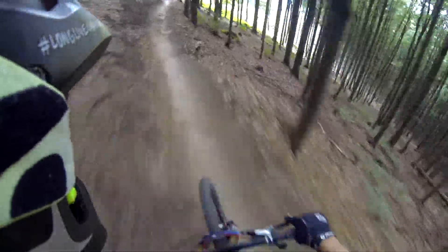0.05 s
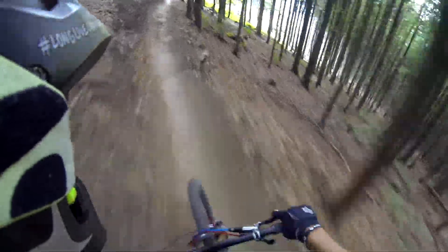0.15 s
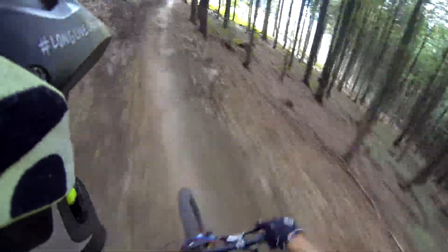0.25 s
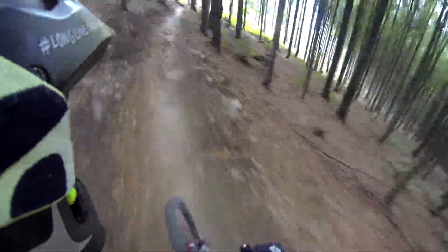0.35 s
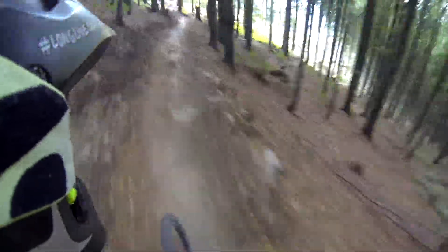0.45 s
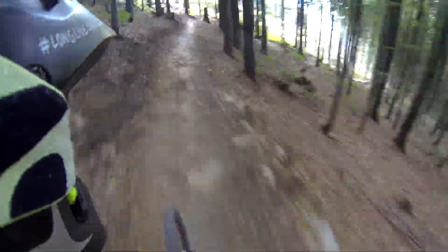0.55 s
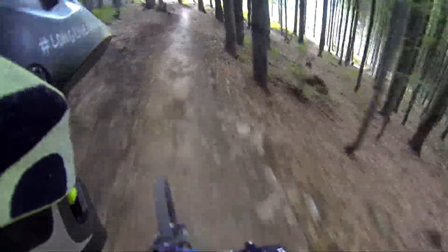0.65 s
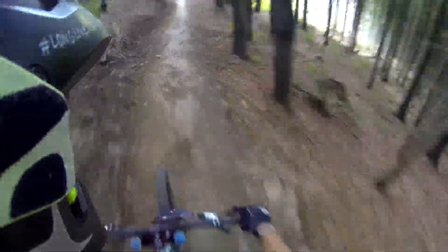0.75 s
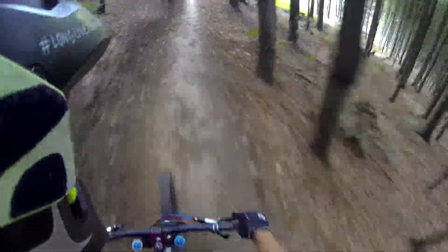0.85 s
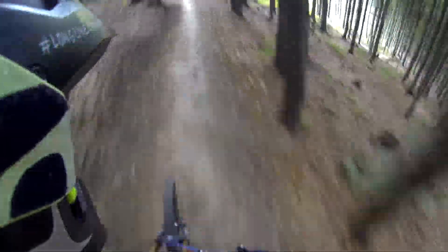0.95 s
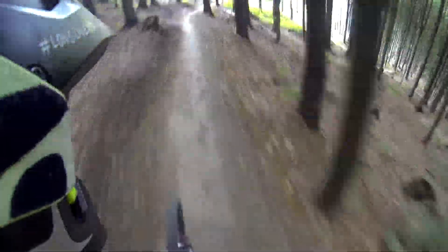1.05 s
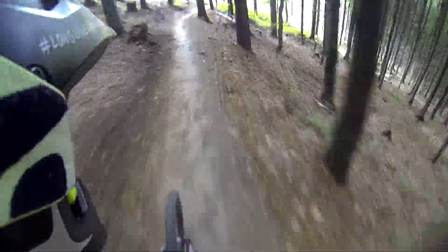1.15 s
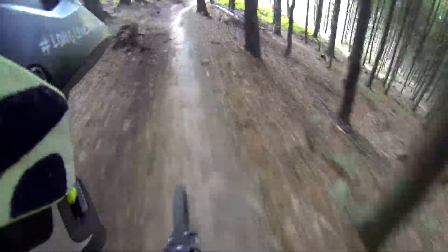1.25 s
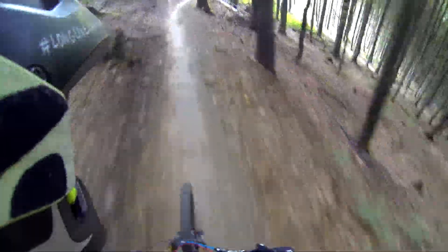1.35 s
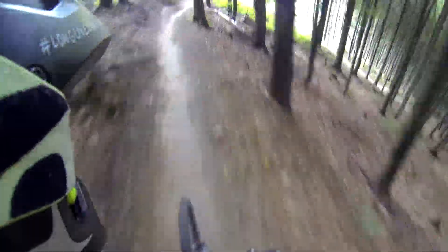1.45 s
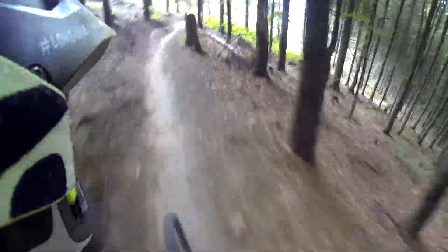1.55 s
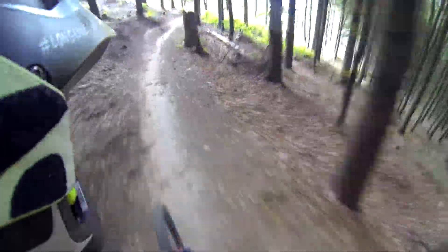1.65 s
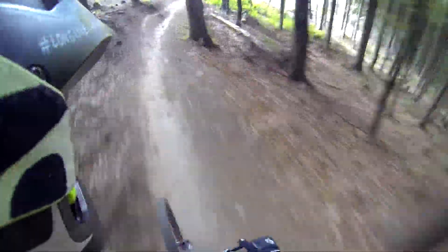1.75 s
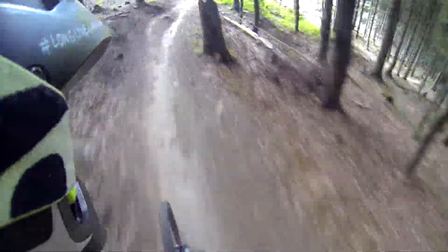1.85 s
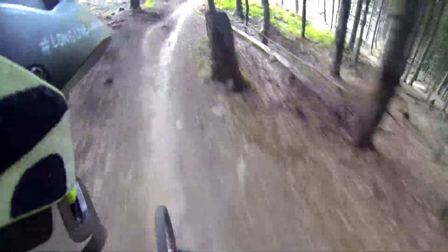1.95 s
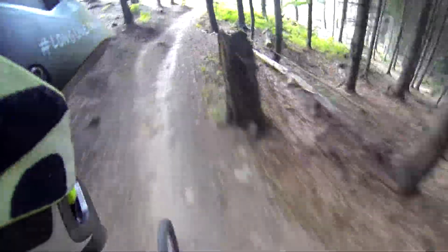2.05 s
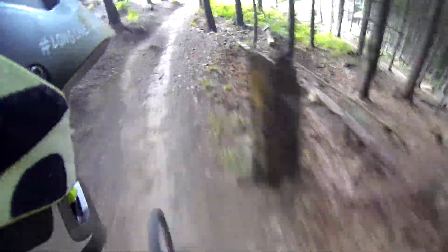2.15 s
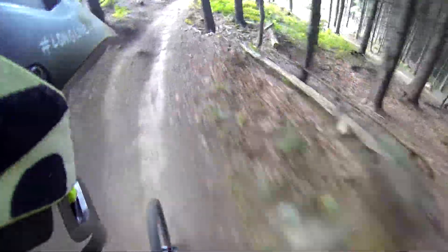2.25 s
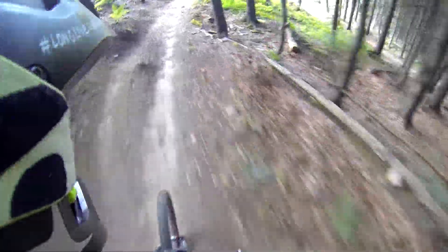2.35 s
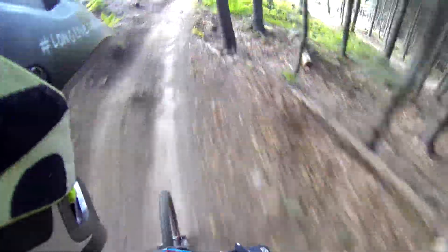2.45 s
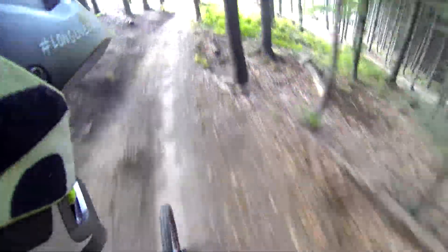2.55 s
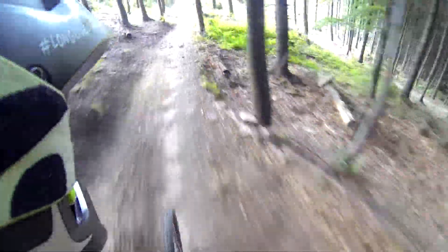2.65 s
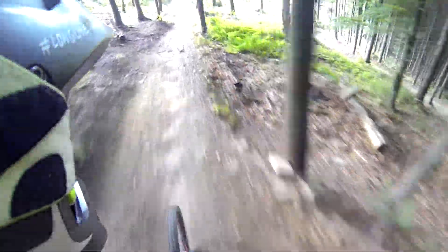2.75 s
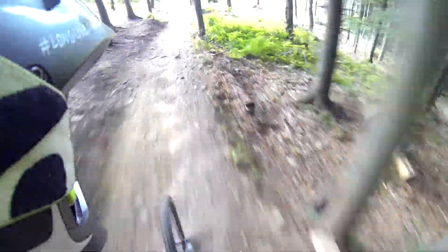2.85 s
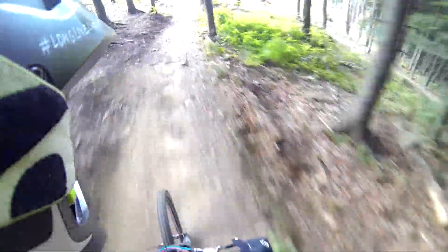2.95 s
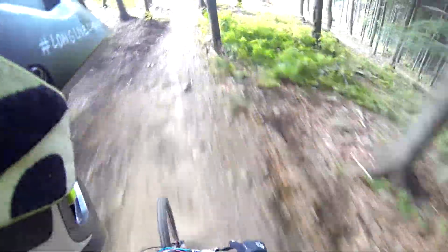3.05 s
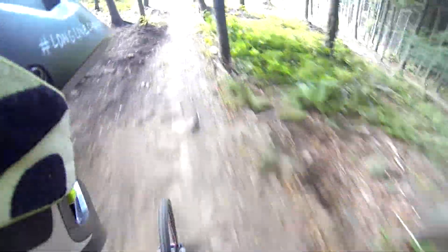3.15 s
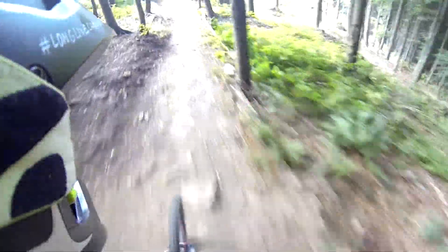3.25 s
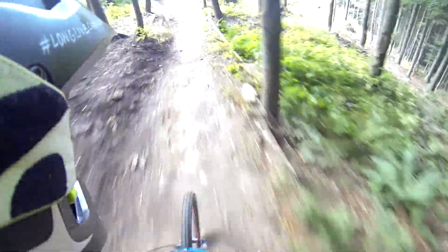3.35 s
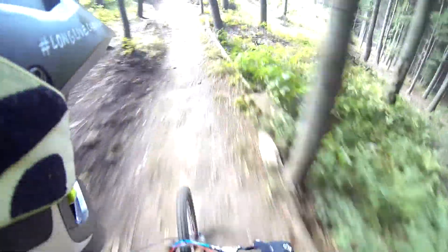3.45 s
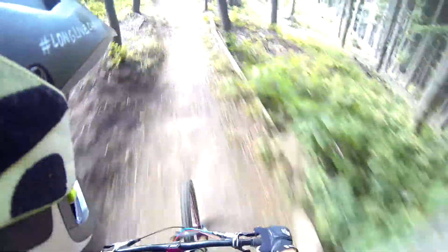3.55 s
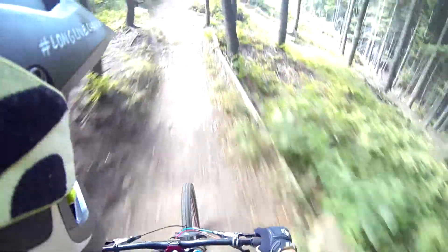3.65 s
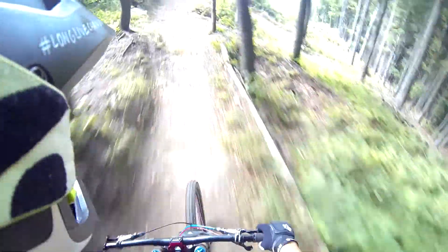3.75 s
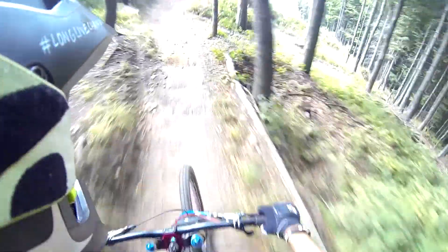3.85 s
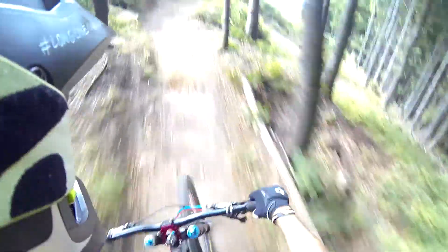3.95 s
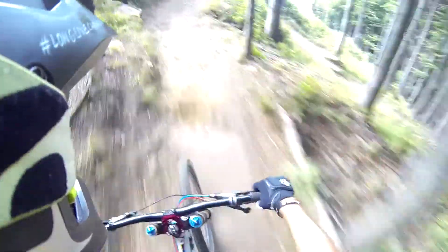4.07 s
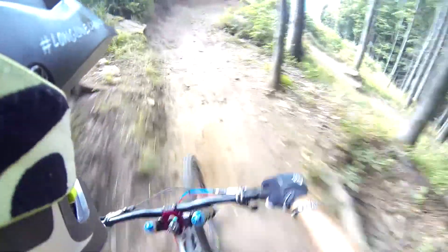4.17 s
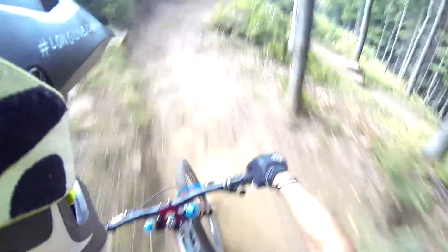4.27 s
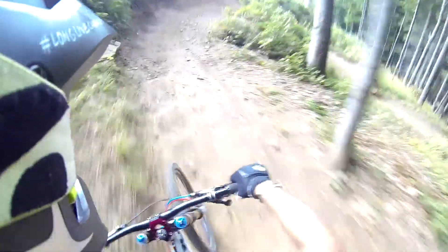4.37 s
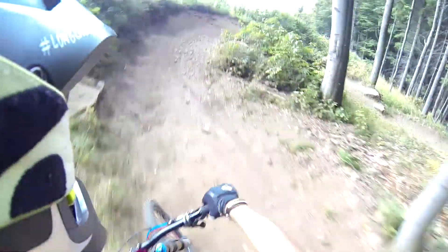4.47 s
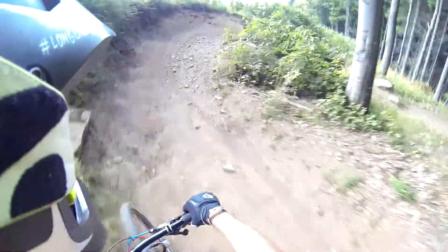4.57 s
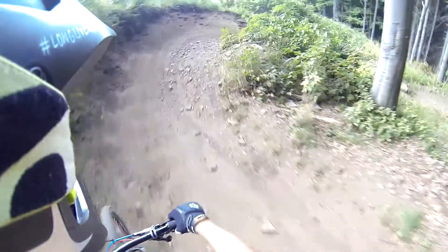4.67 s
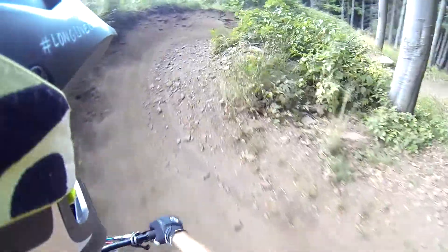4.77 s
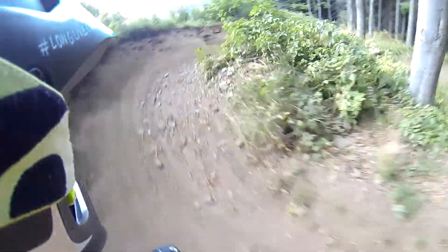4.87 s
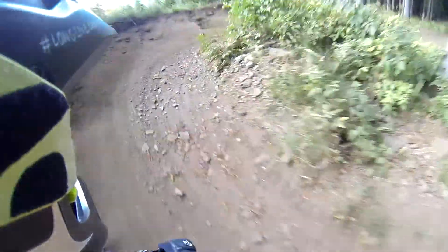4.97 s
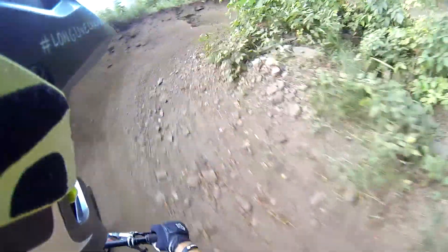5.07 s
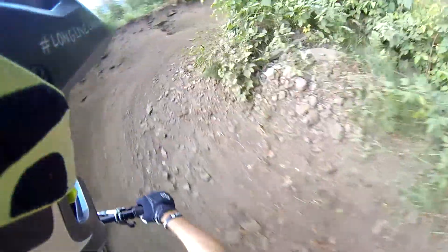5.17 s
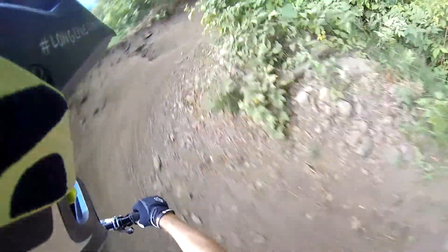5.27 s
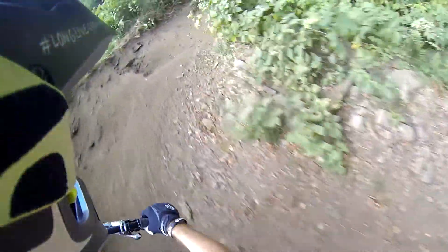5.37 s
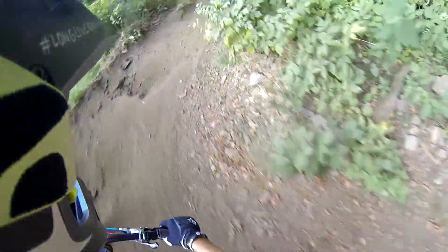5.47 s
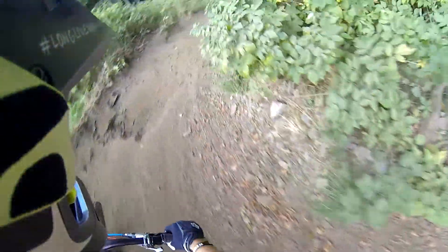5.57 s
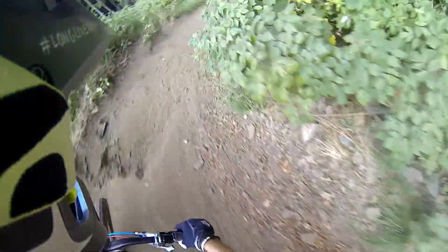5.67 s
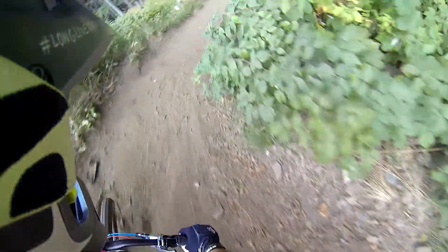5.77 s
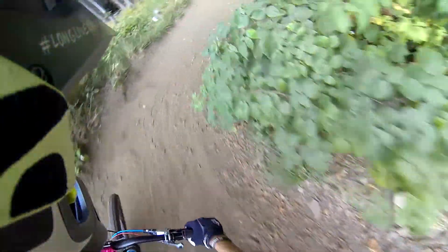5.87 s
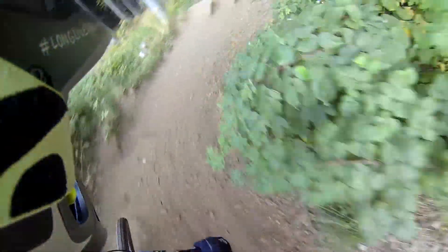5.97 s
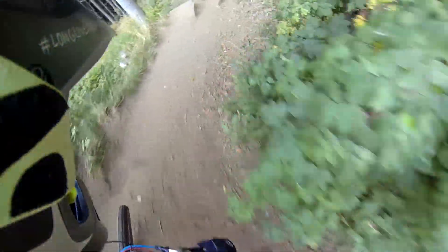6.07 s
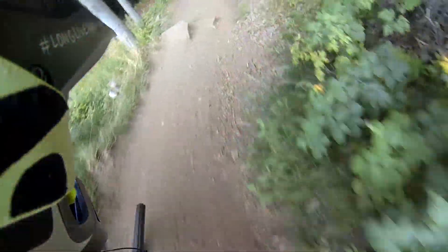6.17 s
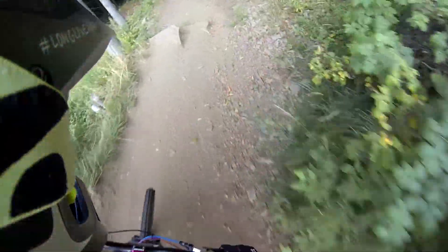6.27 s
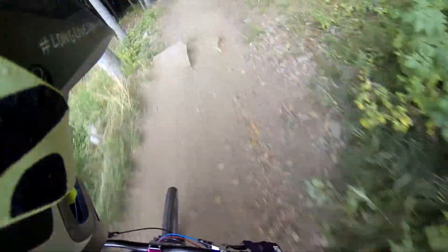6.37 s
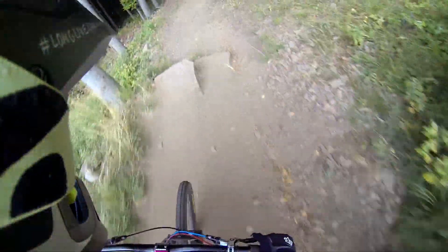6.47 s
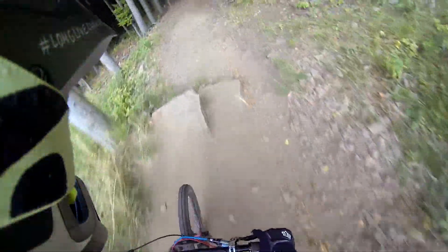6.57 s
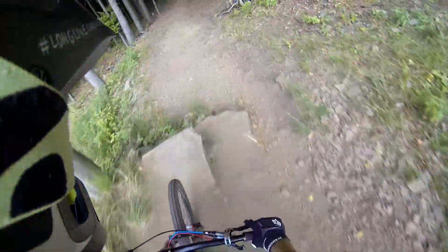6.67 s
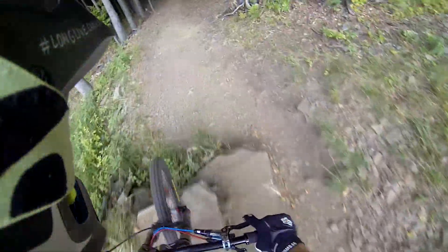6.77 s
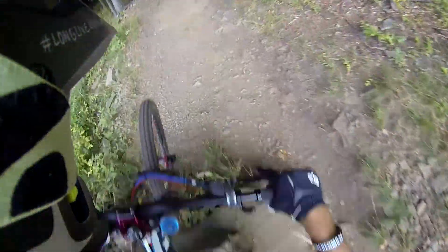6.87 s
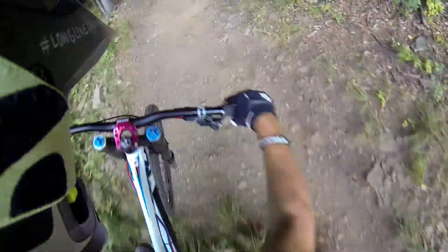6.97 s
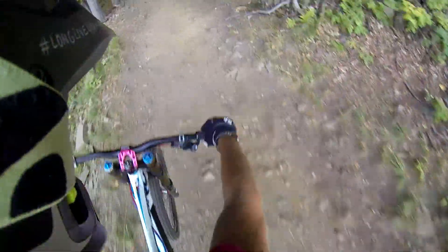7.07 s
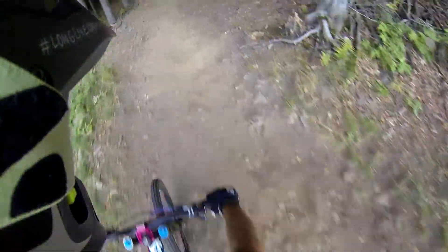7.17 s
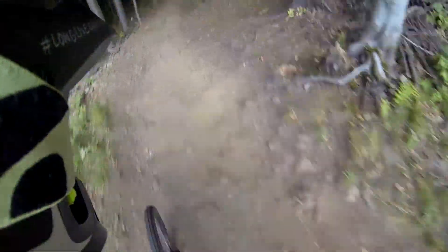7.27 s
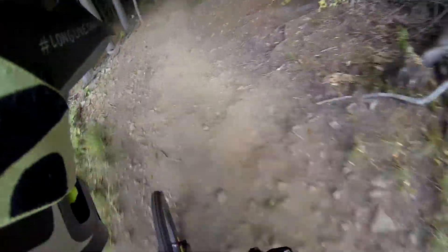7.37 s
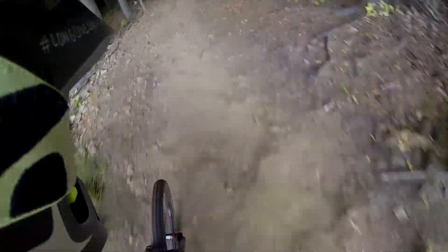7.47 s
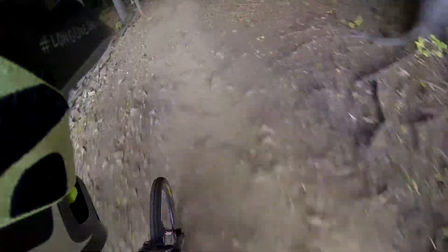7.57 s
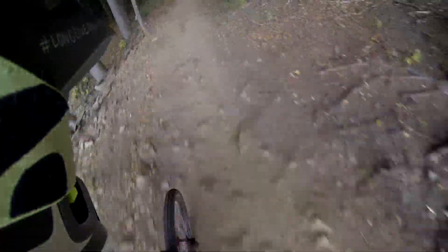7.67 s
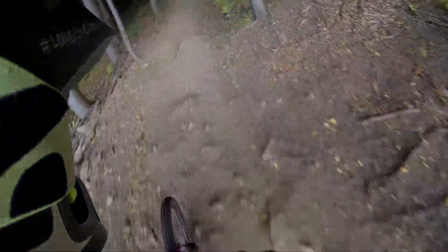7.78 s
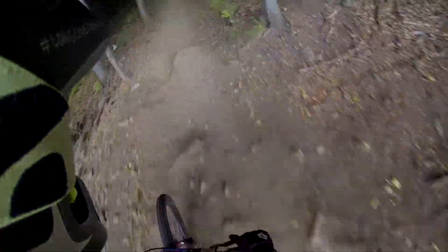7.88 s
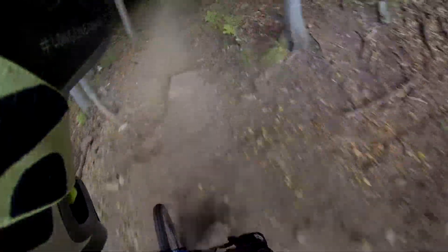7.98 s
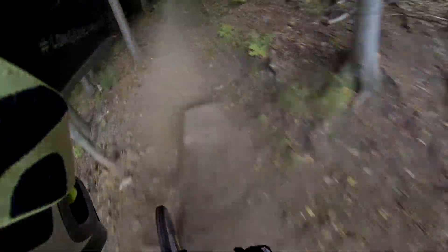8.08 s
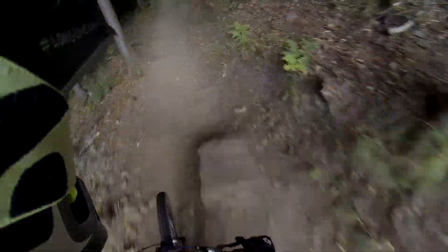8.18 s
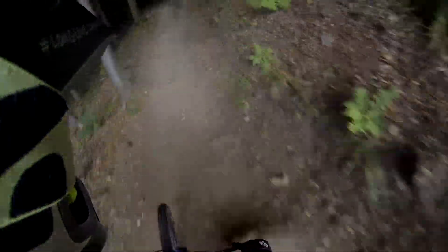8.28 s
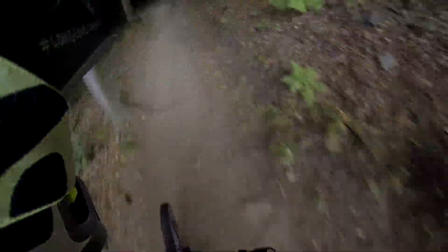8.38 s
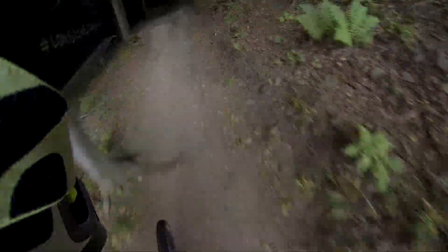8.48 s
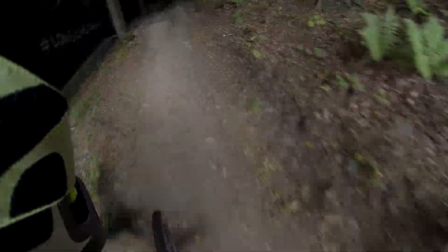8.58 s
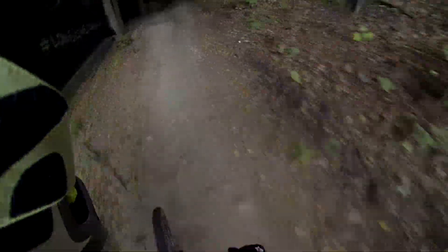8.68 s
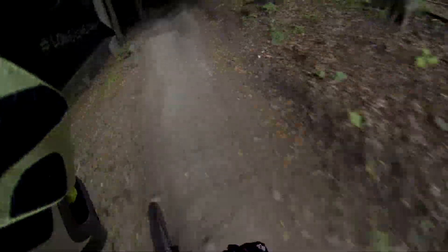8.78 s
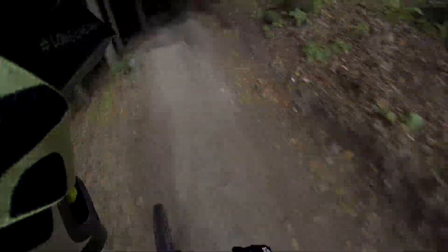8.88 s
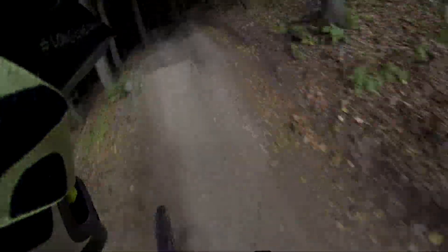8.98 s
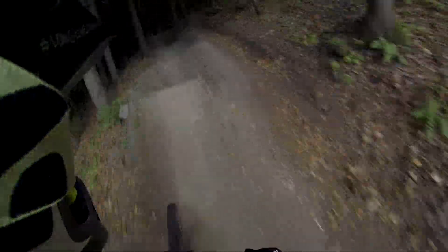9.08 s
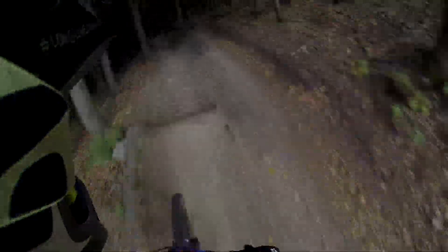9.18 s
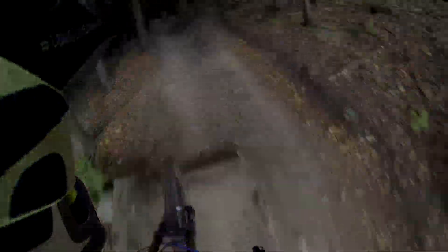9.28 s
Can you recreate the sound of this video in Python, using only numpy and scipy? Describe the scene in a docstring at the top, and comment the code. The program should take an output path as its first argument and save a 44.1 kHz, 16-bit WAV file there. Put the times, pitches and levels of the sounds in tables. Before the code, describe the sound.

A mountain bike descends a dirt forest trail, heard from a helmet camera microphone. From 0 to 4.5 seconds, deep wind buffeting and a fluttering rush surge in gusts, over quieter tyre crunch, jingling chain, clinks, snapping stones and dull frame knocks. Sharper knocks stand out near 2.2, 3.9 and 4.2 seconds, with a stone ping around 3.1. At 4.9 a hard rap hits the camera housing, and the wind drops through a slow bend, leaving faint scuffs near 5.3. A wheel slams with a ringing clack and rattle at 6.1. Faint brake squeaks chirp between 5.8 and 7.5. A low double tyre thud with clatter lands at 7.2 to 7.3. From 7.7 the wind and rolling strengthen again, with bright clinks and knocks around 8.0 to 8.6, and a short hollow rumble at 9.2. A thin, high hiss stays faint behind.

```python
"""A mountain bike runs down a dirt trail, heard from a microphone in a camera on the rider's helmet.
Its knobby tyres crunch over grit (coloured impacts and noise) and at the end roll onto something hollow.
Chain and cables clink, the frame knocks, stones snap and ping, wheels clack or thud: shaped noise and ringing modes.
Close by, wind buffets the microphone and eases in a slow bend: coloured noise in eddies, gusts and lulls.
The camera housing takes a few raps, a brake squeaks faintly, and a thin hiss lies high up behind it all."""
import sys
import numpy as np
from scipy import signal
from scipy.fft import rfft, irfft
from scipy.io import wavfile
from scipy.ndimage import uniform_filter1d

SR = 44100
rng = np.random.default_rng(int(sys.argv[2]) if len(sys.argv) > 2 else 0)


def dump(signal):
    """Clip the signal to [-1, 1] and save it as 16-bit WAV at the path in sys.argv[1]."""
    limited = np.clip(np.atleast_2d(signal).T, -1, 1)
    pcm = np.round(limited * 32767).astype(np.int16)
    wavfile.write(sys.argv[1], SR, pcm)


N = 411438
TIME = np.arange(N) / SR


def amp(db):
    """Decibels to gain."""
    return 10 ** (np.asarray(db) / 20)


def evened(x):
    """Scales to rms 1."""
    return x / np.sqrt(np.mean(x ** 2) + 1e-20)


def curve(rows):
    """A level in dB, joined by straight lines in time."""
    return np.interp(TIME, *np.transpose(rows))


def lift(s, half_s, db):
    """Rounded changes of level, in dB, that come and go."""
    return sum(top * np.exp(-((TIME - at) / half) ** 2) for at, half, top in zip(s, half_s, db))


def add(mix, s, sound):
    """Mixes a sound in at time s."""
    part = mix[max(round(s * SR), 0):][:len(sound)]
    part += sound[:len(part)]


def band(x, edges):
    """The part of a sound between two frequencies."""
    return signal.sosfilt(signal.butter(3, edges, "band", fs=SR, output="sos"), x)


def response(points, size=4096):
    """The causal impulse response of a colour, falling away beyond its last point."""
    hz, db = np.transpose(points)
    f = abs(np.fft.fftfreq(size, 1 / SR))
    gain = amp(np.interp(np.log(f + 1), np.log(hz), db))
    gain = gain / np.maximum(f / hz[-1], 1) ** 2
    # minimum phase: the phase follows from the log gain
    spectrum = np.exp(np.conj(signal.hilbert(np.log(gain))))
    return np.fft.ifft(spectrum).real[:size // 2]


def coloured(x, points, edges, size=4096):
    """Colours a sound and brings its main band to rms 1."""
    y = signal.oaconvolve(x, response(points, size))[:N]
    return y / np.std(band(y, edges))


def wander(hz):
    """Slow chance of rms 1, fading out above a rate."""
    f = np.fft.rfftfreq(N, 1 / SR)
    return evened(irfft(rfft(rng.standard_normal(N)) / (1 + (f / hz) ** 4), N))


def steadied(x, span_s):
    """Holds the slow level of a noise even, leaving its fast churning."""
    window = signal.windows.hann(int(span_s * SR))
    weight = signal.oaconvolve(np.ones(N), window, "same")
    power = signal.oaconvolve(x ** 2, window, "same") / weight
    return np.std(x) * evened(x / np.sqrt(np.maximum(power, 1e-12)))


def grains(per_s, spread_db):
    """Random tiny impacts, a few much larger than the rest."""
    size = amp(spread_db * np.minimum(rng.exponential(1, N), 4))
    sign = rng.choice([-1., 1.], N)
    return evened(size * sign * (rng.random(N) < per_s / SR))


def ticks(per_s, spread_db, low_hz, high_hz, decay_s, count=24):
    """Many small things struck at random, each ringing briefly at its own pitch."""
    t = np.arange(SR // 25) / SR
    out = np.zeros(N)
    for hz in np.geomspace(low_hz, high_hz, count):
        tone = np.exp(-t / decay_s) * np.sin(2 * np.pi * hz * t)
        out += signal.oaconvolve(grains(per_s / count, spread_db), tone)[:N]
    return evened(out)


def swells(rows, colour):
    """Brief rounded bursts of coloured noise."""
    swell = sum(amp(db) * np.exp(-((TIME - s) / half) ** 2) for s, db, half in rows)
    return swell * coloured(rng.standard_normal(N), colour, (200, 3000))


def clatter(rows, colour, edges, strike, rise_s, decay_s, tail_db, tail_s, part_db=8, part_q=1.8):
    """Each blow is a strike, a scatter of contacts and a faint after-rattle; a pitched part rings broadly."""
    out, t, body = np.zeros(N), np.arange(SR // 8) / SR, response(colour)
    scatter = np.exp(-t / decay_s) + amp(tail_db) * np.exp(-t / tail_s)
    shape = (1 - np.exp(-t / rise_s)) * scatter
    for s, db, *pitch in rows:
        contacts = shape * rng.standard_normal(len(t))
        contacts[0] = strike * np.linalg.norm(contacts)
        blow = signal.fftconvolve(contacts, body)
        if pitch:
            part = signal.lfilter(*signal.iirpeak(pitch[0], part_q, fs=SR), blow)
            blow = blow + amp(part_db) * part
        # crest: twice the strongest short-time rms in the main band
        crest = 2 * np.sqrt(uniform_filter1d(band(blow, edges) ** 2, size=128).max())
        add(out, s, amp(db) * blow / crest)
    return out


def ring(rows, modes, detune, contact_hz):
    """Single blows on a set of modes, a little different each time; a softer contact is duller."""
    out, t = np.zeros(N), np.arange(SR // 12) / SR
    contact = signal.butter(3, min(contact_hz, .45 * SR), fs=SR)
    for s, peak_db in rows:
        spot = 1 + detune * rng.standard_normal(len(modes))
        swings = [amp(db - 60 * t / t60) * np.sin(2 * np.pi * hz * k * t)
                  for (hz, db, t60), k in zip(modes, spot)]
        # neighbouring modes swing in opposite senses, so the ring takes a moment to build
        blow = signal.lfilter(*contact, sum(swings[::2]) - sum(swings[1::2]))
        add(out, s, amp(peak_db) * blow / abs(blow).max())
    return out


# Level of the thin hiss. Each row: time in seconds, level in dB.
HISS_LEVEL = [(.7, -80), (1.1, -73.5), (9.33, -73)]
# Colour of the hiss. Each row: frequency in Hz, relative density in dB per Hz.
HISS_COLOUR = [(5000, -12), (7200, -6.5), (8500, 5.5), (9500, -3), (11900, -4.5), (13300, 4.5),
               (15000, -20)]


def hiss():
    """Faint thin noise high up, behind everything."""
    return amp(curve(HISS_LEVEL)) * coloured(rng.standard_normal(N), HISS_COLOUR, (11500, 15500))


# Force of the headwind, easing through the slow bend. Each row: time in seconds, level in dB.
HEADWIND = [(-0.0, -12), (0.29, -14), (0.76, -17), (2.45, -18.5), (2.5, -15), (3.0, -14), (4.13, -14.5),
            (4.92, -19.5), (5.09, -24.5), (5.44, -22.5), (5.79, -30.5), (6.29, -28), (6.8, -21),
            (7.05, -26.5), (7.65, -20.5), (7.76, -16.5), (8.47, -14.5), (9.33, -14.5)]
# Gusts and lulls on the headwind. Each row: centre in seconds, half length in seconds,
# lift of the buffeting in dB, lift of the rush in dB.
GUSTS = [(0.207, 0.02, -9, -1.5), (0.296, 0.03, 5, 4), (0.653, 0.13, 2, 7), (0.753, .025, -6, -3),
         (0.84, .04, -1.5, 7), (0.917, 0.012, -6, -1), (1.115, 0.098, 4.5, 8.5), (1.287, 0.011, 7.5, 4),
         (1.36, 0.02, -4, -3.5), (1.52, 0.19, 3.5, 6.5), (1.85, 0.02, -5, -5), (1.918, 0.021, 9.5, 8),
         (2.17, 0.23, 4.5, 5), (2.405, 0.042, -3, 0), (2.554, 0.06, 5, 0), (3.012, 0.13, 3.5, 3.5),
         (3.586, 0.019, 2.5, 0), (3.678, 0.014, -17, 5), (4.08, 0.049, 5, 1), (4.23, .025, -6, -2),
         (4.303, 0.012, 5, 1), (5.43, 0.053, 6.5, 2), (6.126, 0.064, 4, 11), (6.306, 0.12, -1.5, 3.5),
         (6.85, 0.078, 1.5, -0.5), (7.32, 0.16, 8, 9), (7.86, 0.25, 0, 1), (8.143, 0.047, -6, 0.5),
         (8.312, 0.057, 5.5, 3), (9.203, 0.026, -1, 6.5)]
# Colours of the buffeting and of the finer rush. Each row: frequency in Hz, relative density in dB per Hz.
BUFFET_COLOUR = [(8, -7), (20, -10), (32, 1.5), (65, -2), (110, -5.5), (170, -11.5), (260, -21), (500, -48),
                 (1200, -86)]
RUSH_COLOUR = [(70, -21), (160, -2), (270, -2), (400, -6.5), (600, -12.5), (850, -18), (1200, -24.5),
               (2000, -30), (4000, -53.5), (9000, -89.5)]
# the rush at a brisk headwind, and the dB it gains for each dB of headwind
BRISK_DB, RUSH_DB, RUSH_GROWTH = -15, -27, 1.48


def wind(eddy_db=1.5, buffet_db=0.09, coupling=0.15, darkening=0.43, deep_hz=85, surge_db=1.2, surge_hz=7):
    """Large eddies thump the microphone port; a finer rush flutters with them and grows faster with headwind."""
    s, half_s, thump_lift, rush_lift = np.transpose(GUSTS)
    force = curve(HEADWIND) - BRISK_DB
    eddies = amp(eddy_db * wander(30))
    thump = coloured(rng.standard_normal(N) * eddies, BUFFET_COLOUR, (20, 200), size=16384)
    thump = steadied(thump, .3)
    churn = rng.standard_normal(N) * eddies * np.exp(coupling * thump)
    rush = steadied(coloured(churn, RUSH_COLOUR, (250, 700)), .15)
    # slower air sheds fewer small eddies, so the buffeting deepens
    deep = signal.sosfiltfilt(signal.butter(2, deep_hz, fs=SR, output="sos"), thump)
    thump = deep + (thump - deep) * amp(darkening * np.minimum(force, 0))
    thump = thump * amp(curve(HEADWIND) + buffet_db + lift(s, half_s, thump_lift))
    rush = rush * amp(RUSH_DB + RUSH_GROWTH * force + lift(s, half_s, rush_lift))
    # both surge and ebb together
    surges = evened(steadied(amp(surge_db * wander(surge_hz)), .6))
    return surges * (thump + rush)


def overload(x, ceiling=0.92):
    """The strongest swings flatten softly at the diaphragm's limit."""
    return x / (1 + (x / ceiling) ** 4) ** (1 / 4)


# Raps on the camera housing, at the microphone itself. Each row: start in seconds, peak in dB.
RAPS = [(4.883, -11), (4.8973, -2), (4.9003, -15), (4.9065, -16), (4.912, -18)]
# Ringing of the housing. Each row: frequency in Hz, relative level in dB, time to fall 60 dB in seconds.
HOUSING_MODES = [(450, -2, .012), (720, -6, .03), (855, 1, .03), (980, 2, .02), (1180, 13, .008),
                 (1590, 2, .017), (2080, -3, .02), (2500, -8, .013), (3000, -8, .007), (3500, -14, .008),
                 (5150, -30, .04)]


def raps():
    """Blows on the camera housing excite its short-lived modes."""
    return ring(RAPS, HOUSING_MODES, detune=0.025, contact_hz=4800)


# Faint squeaks of a brushing brake. Each row: start in seconds, length in seconds,
# start pitch in Hz, end pitch in Hz, level in dB.
SQUEAKS = [(5.834, 0.035, 2100, 2230, -48), (6.254, 0.038, 2120, 2000, -42),
           (6.817, 0.073, 1700, 2340, -42.5), (6.953, .06, 1900, 2900, -43), (7.42, 0.053, 2360, 2000, -37)]


def squeaks(waver=0.089):
    """Stick and slip of the brake: a short, unsteady tone that glides."""
    out = np.zeros(N)
    for s, length_s, start_hz, end_hz, db in SQUEAKS:
        size = int(length_s * SR)
        hz = np.linspace(start_hz, end_hz, size) * (1 + waver * wander(400)[:size])
        tone = np.sin(2 * np.pi * np.cumsum(hz) / SR)
        add(out, s, amp(db) * evened(np.hanning(size) * tone))
    return out


# Colour of chain and cables. Each row: frequency in Hz, relative density in dB per Hz.
CHAIN_COLOUR = [(900, -9.5), (2080, 11.5), (2700, -7), (3080, 3.5), (3900, -1), (4450, -8.5), (5000, 0),
                (5300, 2), (6200, -9), (6850, -8.5), (7600, -14), (8500, -11.5), (11800, -25), (15000, -29)]
# the jingle at a fast roll, and the dB it gains for each dB of rolling
FAST_ROLL_DB, JINGLE_DB, JINGLE_GROWTH = -37, -60.5, 0.87


def jingle(clump_db=3.5, ringing=0.75, shaking=1.0):
    """Chain links chatter in clumps, more at speed and on rough ground, some ringing briefly."""
    s, half_s, _, chain_lift = np.transpose(ROUGH_GROUND)
    links = coloured(grains(per_s=2500, spread_db=3), CHAIN_COLOUR, (5000, 11000))
    tinkle = ticks(per_s=1600, spread_db=7.5, low_hz=2930, high_hz=12460, decay_s=0.0039, count=32)
    tinkle = coloured(tinkle, CHAIN_COLOUR, (5000, 11000))
    chatter = (links + ringing * tinkle) / np.hypot(1, ringing)
    clumps = evened(steadied(amp(clump_db * wander(40)), 0.3))
    level = JINGLE_DB + JINGLE_GROWTH * (curve(ROLLING) - FAST_ROLL_DB)
    level = level + shaking * lift(s, half_s, chain_lift)
    return amp(level) * chatter * clumps


# Chain and cables strike the frame hard. Each row: start in seconds, level in dB before the mix trim.
CLINKS = [(0.2548, -37), (0.4095, -36.5), (0.8131, -37), (0.9991, -33), (1.1424, -33.5), (1.5573, -33.5),
          (1.7933, -36), (1.8437, -38), (2.257, -28.5), (2.8335, -34), (3.1602, -34), (3.271, -29.5),
          (3.3797, -32), (3.6721, -38.5), (3.927, -33.5), (4.1949, -36.5), (4.4782, -32), (4.5351, -32.5),
          (4.6563, -32.5), (4.819, -31), (4.8705, -31.5), (5.0609, -34), (5.0968, -40), (5.1724, -34.5),
          (5.5453, -35), (5.8856, -33.5), (5.912, -48), (5.93, -34), (6.1594, -28), (6.2406, -32),
          (6.3639, -34.5), (6.8007, -36), (7.2664, -31), (7.2958, -28.5), (7.9506, -32.5), (8.0304, -26),
          (8.1793, -33), (8.3814, -26), (8.8568, -36), (8.988, -30)]


def clinks():
    """Chain and cables hit the frame in a bright scatter of contacts."""
    return clatter(CLINKS, CHAIN_COLOUR, (4500, 15000), strike=0.5, rise_s=0.0017, decay_s=0.0037,
                   tail_db=-20.0, tail_s=0.045)


# Flung stones on metal. Each row: start in seconds, peak in dB before the mix trim.
PINGS = [(2.6332, -30), (3.0775, -22), (4.0435, -36), (4.163, -36), (7.7542, -28.5), (8.3424, -31)]
# Ringing of struck metal. Each row: frequency in Hz, relative level in dB, time to fall 60 dB in seconds.
METAL_MODES = [(2930, 0, .016), (3990, -6.5, 0.041), (5000, -1, 0.0079), (5680, -3.5, 0.022),
               (6800, -6.5, 0.01), (8500, -10.5, 0.013), (10700, -10, 0.01), (12900, -10, 0.014)]


def flung_grit(below_roll_db=-4, spread_db=4, count=36):
    """Small stones tick against the bike at random, following the rolling level: rows as in PINGS."""
    when, size = rng.random((count, 2)).T
    s = (np.arange(count) + when) / count * N / SR
    roll_db = np.interp(s, *np.transpose(ROLLING))
    return list(zip(s, roll_db + below_roll_db + spread_db * (2 * size - 1)))


def pings():
    """Stones, large and small, set the metal's high modes ringing."""
    return ring(list(PINGS) + flung_grit(), METAL_MODES, detune=0.042, contact_hz=14500)


# Hard jolts that shake the whole bike. Each row: start in seconds, level in dB, decay constant in seconds.
JOLTS = [(6.126, -22, 0.03), (7.235, -24.5, 0.019), (7.261, -34, 0.045), (8.344, -32, 0.031)]
# Colour of the shaken bike. Each row: frequency in Hz, relative density in dB per Hz.
SHAKE_COLOUR = [(250, -48), (550, 4), (850, 1), (1300, -2), (2100, -4.5), (2750, -8), (3100, -9),
                (4200, -19), (5400, -16), (6200, -28), (14000, -41)]


def jolts():
    """A hard landing sets every loose part rattling at once."""
    shake = sum(amp(db) * (TIME >= s) * np.exp(-abs(TIME - s) / decay) for s, db, decay in JOLTS)
    return shake * coloured(grains(per_s=1400, spread_db=2.5), SHAKE_COLOUR, (300, 8000))


# Wheels hit roots and rocks and some part of the frame knocks. Each row: start in seconds,
# level in dB before the mix trim, pitch of the part in Hz.
KNOCKS = [(1.27, -19.5, 1150), (1.4386, -18.5, 805), (1.7469, -22, 837), (2.2149, -15, 1860),
          (3.5568, -20, 1890), (3.7499, -21, 2760), (3.8195, -20, 900), (3.9, -14, 1790),
          (4.2358, -12.5, 1730), (4.593, -25.5, 826), (4.9856, -20.5, 1820), (6.1024, -29, 886),
          (6.111, -24, 2000), (6.1255, -20, 2300), (7.205, -24, 1730), (7.233, -23, 802),
          (7.2615, -23, 2000), (7.278, -27, 1700), (7.297, -29, 900), (7.3801, -23.5, 700),
          (7.452, -20, 1030), (7.671, -20, 1540), (8.0346, -19.5, 860), (8.3414, -13.5, 1970),
          (8.381, -21, 1900), (8.5555, -19.5, 810), (8.5949, -15.5, 1820)]
# Colour of the frame. Each row: frequency in Hz, relative density in dB per Hz.
FRAME_COLOUR = [(200, -18), (500, 2), (850, -0.5), (1250, -4.5), (1800, 0.5), (2300, -2.5), (2700, -6),
                (3200, -7), (4400, -26.5), (5200, -18), (6300, -33), (14000, -54)]
FRAME_BAND = (1200, 4000)  # Hz


def knocks():
    """A bump strikes the frame, and one part of it resonates broadly."""
    return clatter(KNOCKS, FRAME_COLOUR, FRAME_BAND, strike=0.59, rise_s=0.00022, decay_s=0.0048,
                   tail_db=-19, tail_s=0.027)


# A wheel slams down, clacks and bounces. Each row: start in seconds, peak in dB.
CLACKS = [(6.1244, -11), (6.1305, -20), (6.141, -24), (6.155, -26)]
# Ringing of the wheel. Each row: frequency in Hz, relative level in dB, time to fall 60 dB in seconds.
WHEEL_MODES = [(540, -11, .06), (790, -1, .06), (965, 2, .05), (1400, -9, .02), (2050, -6, .05),
               (2230, -7, .05), (2470, -4, .035), (3080, -11, .07)]


def clacks():
    """The landing wheel rings in its own modes at each bounce."""
    return ring(CLACKS, WHEEL_MODES, detune=0.012, contact_hz=5000)


# Tyres take the weight after a drop. Each row: start in seconds, peak in dB.
THUDS = [(6.102, -15), (7.2305, -7), (7.288, -11)]
# Booming of a squashed tyre. Each row: frequency in Hz, relative level in dB, time to fall 60 dB in seconds.
CARCASS_MODES = [(68, 4.5, 0.098), (192, -7, 0.042), (340, -4, 0.046)]


def thuds():
    """A squashed tyre booms in a few low modes under a soft contact."""
    return ring(THUDS, CARCASS_MODES, detune=0.091, contact_hz=600)


# The front wheel rolls onto something hollow, perhaps a wooden plank.
# Each row: centre in seconds, level in dB, half length in seconds.
PLANK = [(9.195, -29, 0.034), (9.233, -17.5, 0.0077), (9.25, -23, 0.025)]
# Colour of the hollow rumble. Each row: frequency in Hz, relative density in dB per Hz.
PLANK_COLOUR = [(200, -13), (450, 9), (750, -2), (1250, -6), (2200, -19), (5000, -55)]


def plank():
    """The front wheel on something hollow, perhaps a wooden plank: short low rumbling bursts of noise."""
    return swells(PLANK, PLANK_COLOUR)


# Tyres snap over single stones. Each row: start in seconds,
# level in dB before the mix trim, pitch of the stone in Hz.
STONES = [(0.7964, -21.5, 1880), (0.9588, -22, 1330), (1.7135, -19.5, 1950), (2.051, -21, 1480),
          (2.7358, -21, 1870), (2.95, -21.5, 1310), (3.6686, -23, 2130), (4.066, -18, 1670),
          (4.3675, -20, 1300), (4.4388, -19, 1780), (5.8765, -26, 1670), (6.6395, -28, 1930),
          (7.8014, -20, 1300), (7.9864, -22.5, 2070), (8.8526, -22.5, 1660)]


def snaps():
    """A stone snaps under the tyre: a very short scatter with a resonance at its pitch."""
    return clatter(STONES, FRAME_COLOUR, FRAME_BAND, strike=0.42, rise_s=0.0002, decay_s=0.003,
                   tail_db=-11, tail_s=0.015, part_db=11.5, part_q=6.7)


# Tyres scuff sideways in the bend. Each row: centre in seconds, level in dB, half length in seconds.
SCUFFS = [(5.27, -38, 0.058), (5.425, -35.5, 0.02)]
# Colour of a sliding tyre. Each row: frequency in Hz, relative density in dB per Hz.
SCUFF_COLOUR = [(350, -8), (750, 7), (1020, 6), (1400, -15)]


def scuffs():
    """Short swells of noise as the tyres slide over the dirt."""
    return swells(SCUFFS, SCUFF_COLOUR)


# Tyres rolling on even dirt, below the rider. Each row: time in seconds, level in dB before the tyre trim.
ROLLING = [(0.0, -42), (0.5, -41), (2.5, -40), (2.82, -38), (4.9, -40.5), (5.33, -46), (5.85, -49),
           (6.61, -45), (7.25, -50), (7.78, -38), (8.52, -37), (9.33, -39)]
# Stretches of rough ground. Each row: centre in seconds, half length in seconds,
# lift of the crunch in dB before the bite factor, lift of the chain's jingle in dB.
ROUGH_GROUND = [(0.227, 0.078, 8, 7), (0.832, 0.023, 1, 8.5), (1.11, 0.15, 6, 7), (1.594, 0.12, 8.5, 10),
                (2.242, 0.054, 2.5, 13.5), (3.3, 0.14, 0, 8), (4.265, 0.04, 2.9, 13), (4.412, 0.067, 8, 20),
                (5.912, 0.065, 11, 5), (6.225, 0.084, 5.5, 6), (6.845, 0.02, 6, 13), (6.99, 0.047, 7, 14),
                (7.284, 0.065, 18, 20), (7.424, 0.071, 8.5, 13), (8.054, 0.14, 0.5, 4),
                (8.363, 0.079, 4.5, 13.5), (9.243, 0.039, 5, -1)]
# Colour of the crunch. Each row: frequency in Hz, relative density in dB per Hz.
TYRE_COLOUR = [(250, -11), (600, 1.5), (850, 3), (1250, -4.5), (1700, -1), (2150, -0.5), (2650, -7.5),
               (3050, -6.5), (3800, -14.5), (4400, -23), (5300, -24), (6300, -38), (10000, -38.5),
               (15000, -59)]


def tyres(level_db=-1.34, lumpy_db=2.5, scrub=0.6, stones=0.58, bite=0.9):
    """Knobs crush grit in clumps over a scrub of loose dirt, harder on rough ground; small stones click."""
    s, half_s, crunch_lift, _ = np.transpose(ROUGH_GROUND)
    grit = grains(per_s=1800, spread_db=0.5) + scrub * rng.standard_normal(N)
    grit = coloured(grit * amp(lumpy_db * wander(41)), TYRE_COLOUR, (1400, 3500))
    pebbles = ticks(per_s=260, spread_db=3.5, low_hz=712, high_hz=5720, decay_s=0.0015)
    pebbles = coloured(pebbles, TYRE_COLOUR, (1400, 3500))
    crunch = (grit + stones * pebbles) / np.hypot(1, stones)
    return amp(curve(ROLLING) + level_db + bite * lift(s, half_s, crunch_lift)) * crunch


def scene(clink_db=-3.5, knock_db=-1, ping_db=4.0, stone_db=-2):
    """Wind, rolling and rattling at one helmet microphone."""
    low_sounds = overload(wind() + plank())
    blows = amp(clink_db) * clinks() + amp(knock_db) * knocks()
    blows = blows + amp(ping_db) * pings() + amp(stone_db) * snaps()
    blows = blows + raps() + clacks() + thuds()
    rolling = tyres() + scuffs() + squeaks()
    return (hiss() + low_sounds + rolling + jingle() + jolts() + blows)[None]


def record(dry, edge_hz=15100):
    """The camera's band limit: a steep low-pass."""
    low_pass = signal.firwin(511, edge_hz, window=("kaiser", 9), fs=SR)
    return signal.oaconvolve(dry, low_pass[None], "same")


dry = scene()
out = record(dry)
dump(out)
```